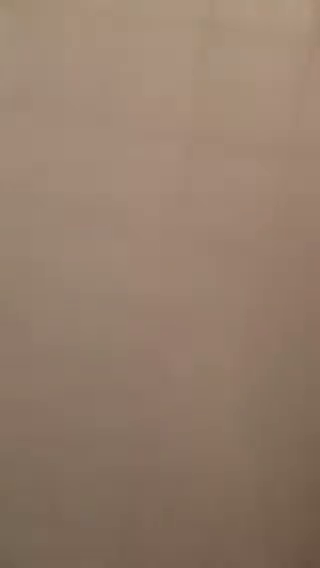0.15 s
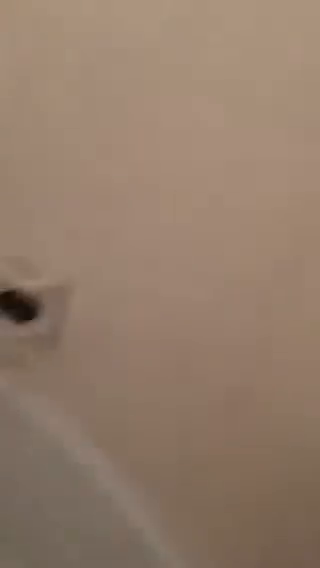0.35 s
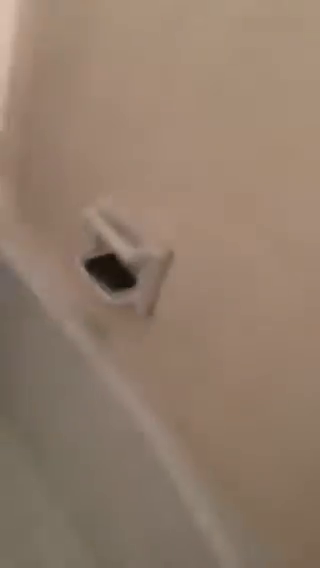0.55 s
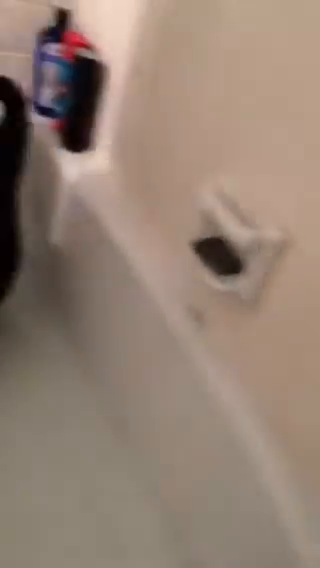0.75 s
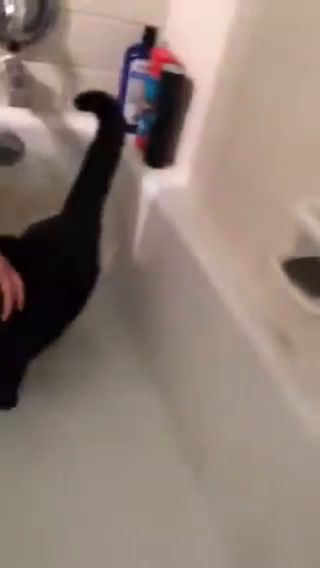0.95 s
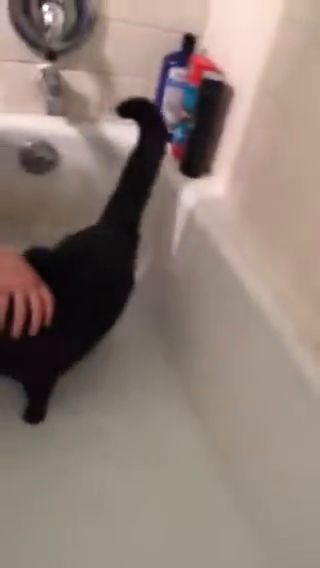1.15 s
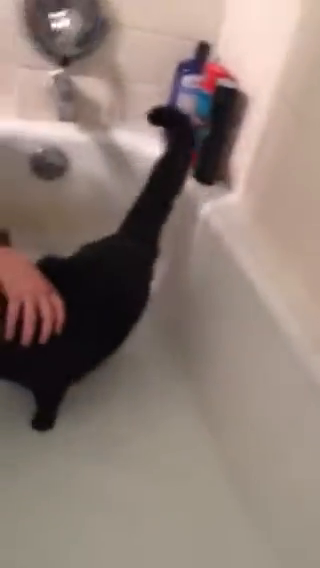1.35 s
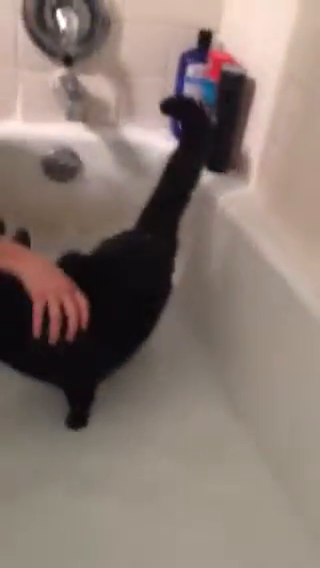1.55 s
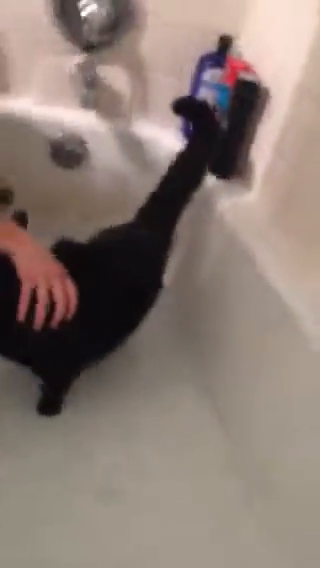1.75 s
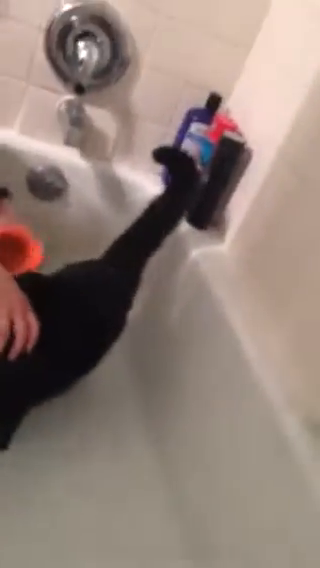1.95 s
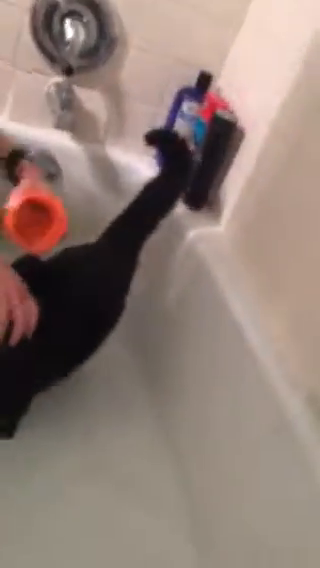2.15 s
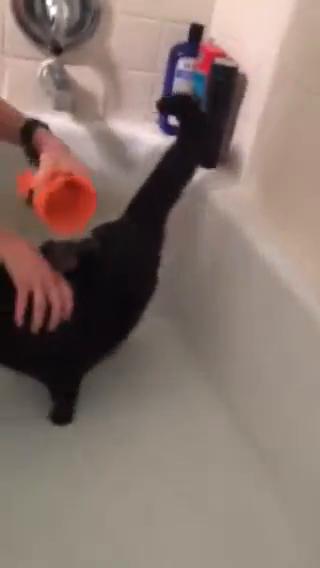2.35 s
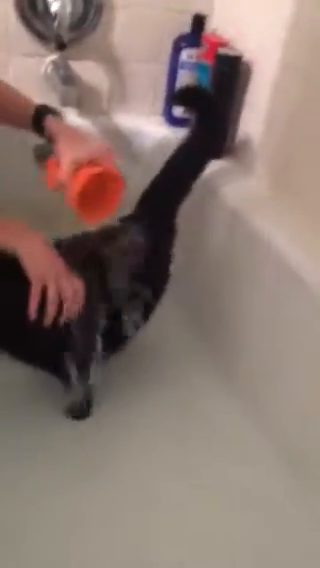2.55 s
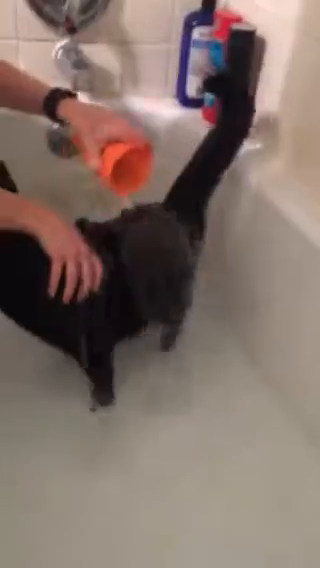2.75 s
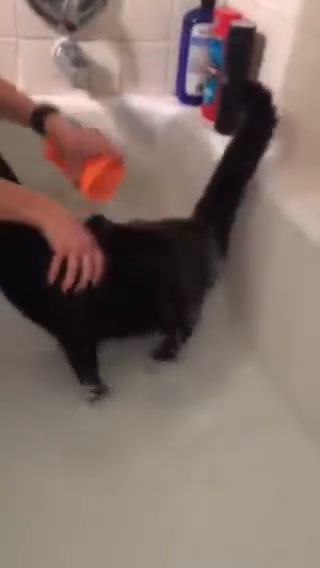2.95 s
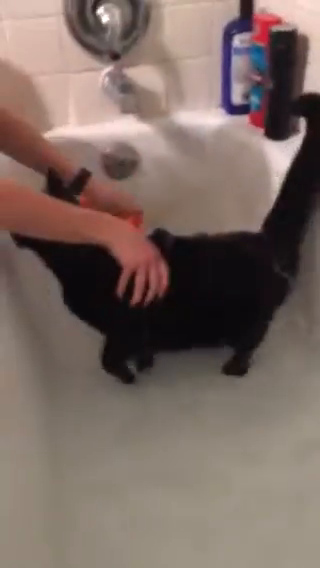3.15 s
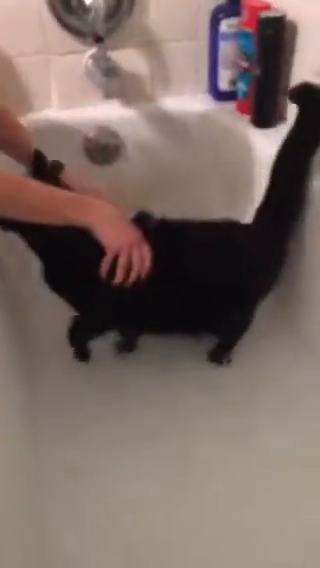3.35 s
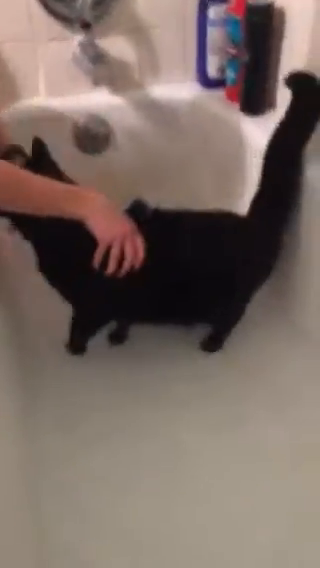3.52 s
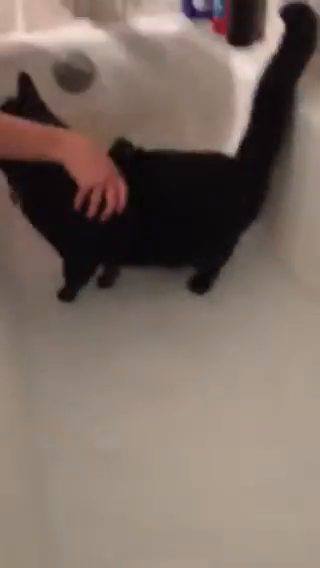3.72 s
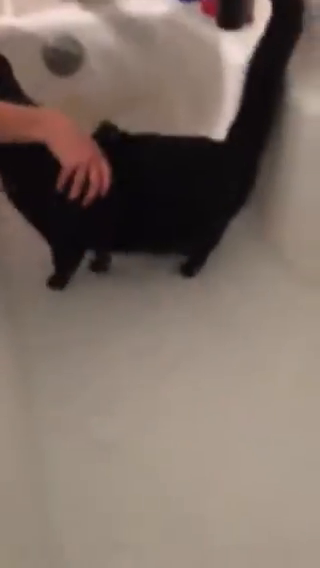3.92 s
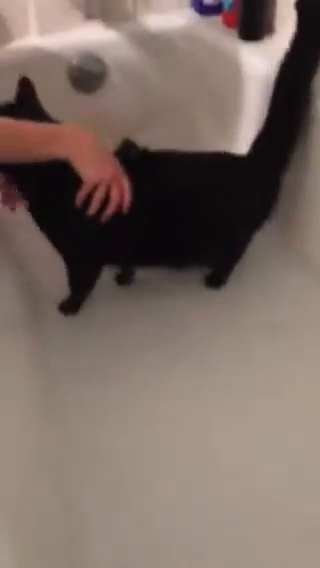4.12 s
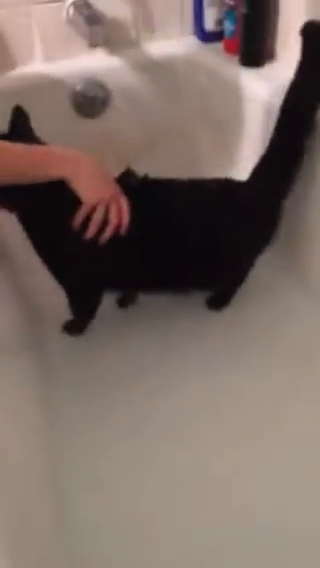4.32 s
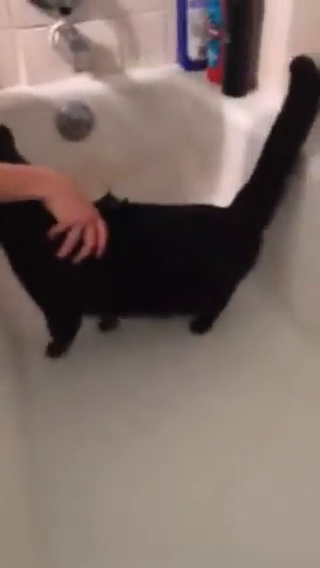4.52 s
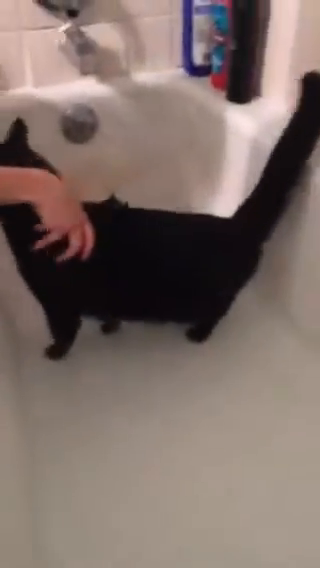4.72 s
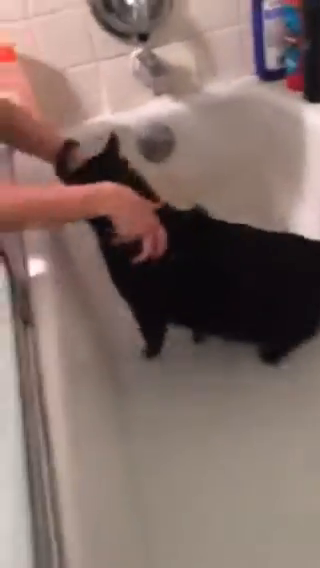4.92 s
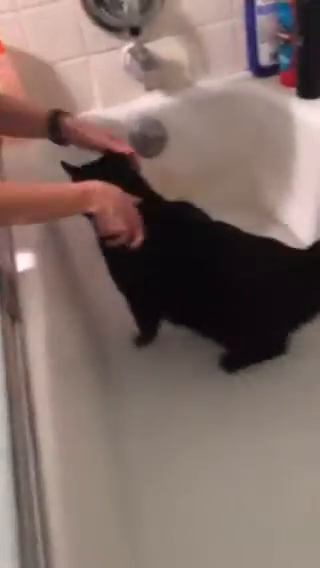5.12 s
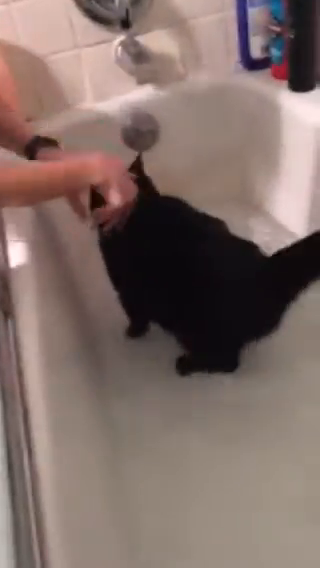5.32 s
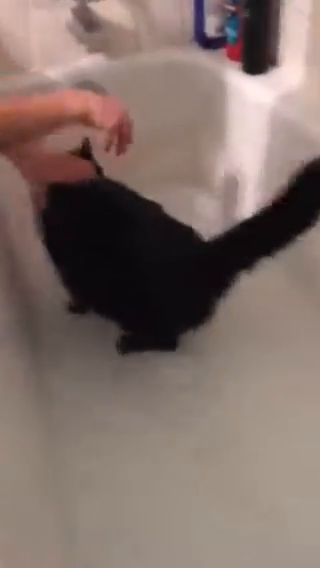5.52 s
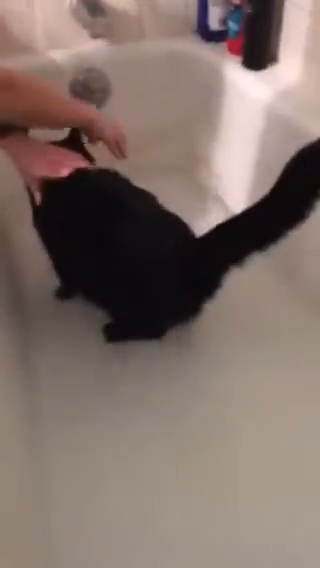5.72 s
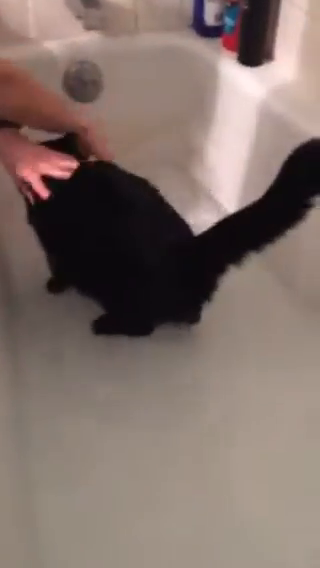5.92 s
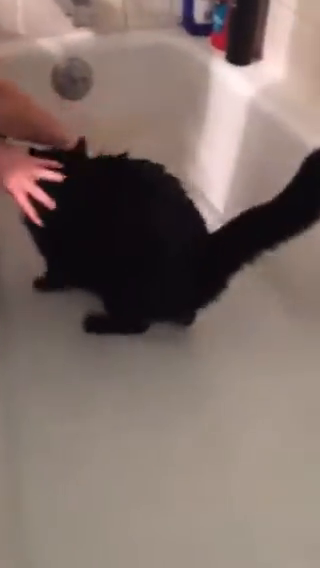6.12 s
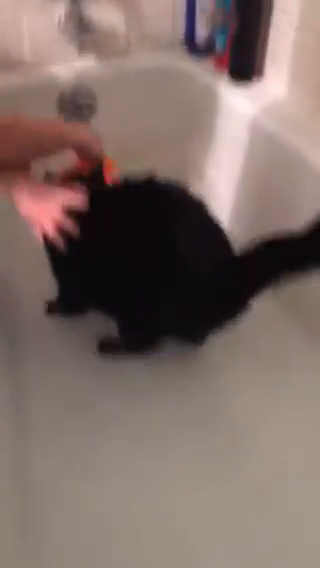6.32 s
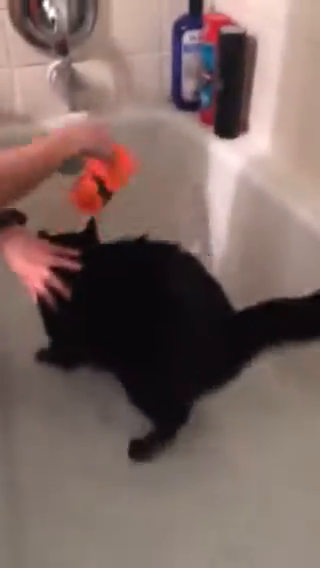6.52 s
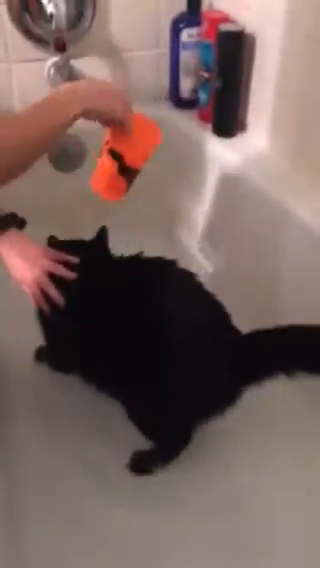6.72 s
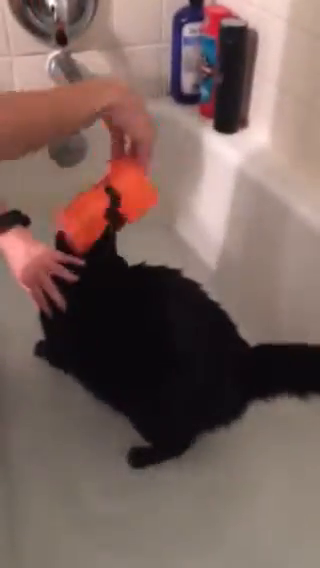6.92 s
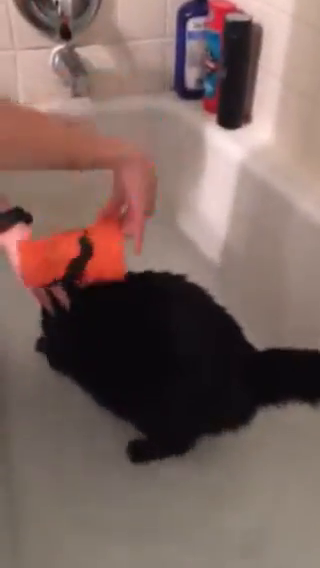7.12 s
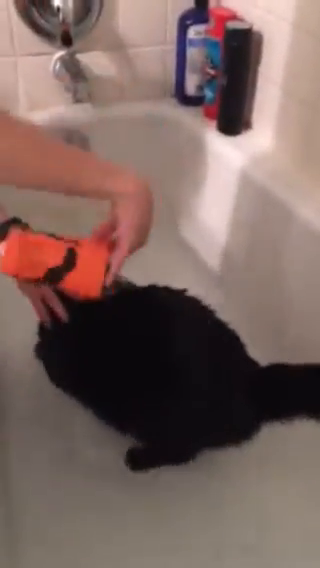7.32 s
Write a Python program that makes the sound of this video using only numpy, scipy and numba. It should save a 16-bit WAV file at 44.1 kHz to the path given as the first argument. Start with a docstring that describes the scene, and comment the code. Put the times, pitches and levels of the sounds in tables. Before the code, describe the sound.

A small bathroom with a hard tub and tiles, heard close, with short bright echoes. From 0 to about 0.7 seconds a cupful of water runs into shallow bath water, with plopping bubbles, fine spray and low gurgles. From 0.8 to 2.6 it calms to uneven drips and small splashes, with a brief dull slipping of wet skin around 1.4, a hollow plop near 1.6 and soft low knocks around 0.9 and 2.0 to 2.1. At 2.7 a second cupful lands, crisp and spattering, gurgling strongly until about 3.4, with a last splash at 3.5. Drips thin out through 4.4, then near silence: faint air and a lumpy low rumble. At 6.2 to 6.7 a few light plops and ticks return, a tiny drip rises in pitch at 6.8, and only sparse, faint drops remain until 7.4.

```python
"""Cat rinsed in a shallow bathtub

Two cupfuls pour off into the bath water with spray, bubbling and low gurgles: clouds of ringing bubbles over a
thin wash of noise. Single drips, smacks with droplets, paw splashes, dull knocks and a run of slips stand out.
Near bubbles, smack crackle and slips also reach the microphone directly; the hard tub and tiles answer with
echoes and a brief dense tail. Steady air and a lumpy low rumble, both coloured noise, lie under it all."""
import sys
import numpy as np
from scipy import signal
from scipy.io import wavfile
from scipy.ndimage import uniform_filter1d
from numba import njit

SR = 44100
rng = np.random.default_rng(int(sys.argv[2]) if len(sys.argv) > 2 else 0)


def materialize(psi):
    """Save the field psi as 16-bit PCM at rate SR to the path in sys.argv[1].

    A 1-D psi becomes a single channel; in a 2-D psi each row is a channel.
    """
    bounded = np.clip(np.atleast_2d(psi).T, -1, 1)
    quanta = np.round(bounded * 32767).astype(np.int16)
    wavfile.write(sys.argv[1], SR, quanta)


N = 325017  # length in samples

# Source levels below are set ahead of the mix in scene(); colours are relative levels.
# low rumble of the place: [t/s, level/dB]
RUMBLE_LEVEL = [(0.0, -58), (.3, -51), (.7, -61), (1.03, -58), (1.3, -63.5), (1.66, -57), (2.2, -47),
                (2.5, -62), (2.9, -47), (3.18, -54), (3.6, -53), (4.2, -70.5), (4.499, -65.5),
                (4.998, -63.5), (5.9, -65), (6.4, -61), (7.37, -63.5)]
# spectrum of the rumble: [f/Hz, level/dB per Hz]
RUMBLE_COLOUR = [(15, -46.5), (25, -18), (46, -15.5), (65, 1), (81, 5), (102, -11.5), (135, -4), (194, -21),
                 (248, -18), (260, -15.5), (340, -40.5), (570, -120)]
# spectrum of the steady air in the room: [f/Hz, level/dB per Hz]
AIR_COLOUR = [(71, -17.5), (120, 0.5), (308, -10), (454, -8), (1030, -17), (1620, -19), (3110, -25),
              (12800, -30), (15000, -28), (16000, -58.5)]
AIR_DB = -69.5
# water pouring off, one table a cupful: [t/s, spray level/dB, bubbling level/dB, gurgle level/dB, gurgle f/Hz]
POURS = [
    [(0.0, -63, -59, -71, 450), (.06, -44.5, -39.5, -51, 484), (.12, -39.5, -39, -38.5, 292),
     (.2, -37, -37.5, -39, 302), (.27, -44.5, -35, -33.5, 353), (.33, -43.5, -37, -32, 216),
     (.47, -37.5, -34, -31.5, 376), (.53, -43, -37, -37, 392), (.68, -57, -50.5, -58.5, 302),
     (.85, -72, -59, -80, 300)],
    [(2.7, -66, -70, -67, 400), (2.77, -40.5, -36, -49.5, 333), (2.81, -38, -44.5, -39, 393),
     (2.85, -37, -28.5, -33.5, 490), (2.91, -32.5, -41, -32, 371), (3.02, -39, -35.5, -33.5, 414),
     (3.19, -37.5, -36, -35, 438), (3.25, -38.5, -36.5, -26.5, 343), (3.37, -43.5, -39, -39.5, 427),
     (3.48, -56, -52.5, -68.5, 423)],
]
BUBBLING_HZ, GURGLE_HZ = 1520, 344.7
LUMPS_DB = 1.8  # rms unevenness of the spray's gushes
# spectrum of the thin wash in the spray: [f/Hz, level/dB per Hz]
SPRAY_COLOUR = [(880, -29.5), (1500, -7), (1780, -5.5), (2540, -14.5), (2830, -7), (13700, -12.5),
                (15500, -15.5), (16000, -44)]
# bath lapping and dripping as it settles: [t/s, spray level/dB]
SETTLING = [(0.0, -57), (.7, -57.5), (1.44, -65.5), (1.9, -64), (2.2, -62), (2.55, -64), (3.65, -57),
            (4.0, -63.5), (4.45, -72), (4.8, -74), (5.75, -84.5), (6.14, -89.5), (6.4, -66.5), (6.8, -79.5),
            (7.37, -85)]
SETTLING_BUBBLING_DB, SETTLING_GURGLE_DB = -0.5, -3.5  # relative to the settling spray
# single ringing bubbles, tiny drips to large air pockets: [t/s, peak level/dB, f/Hz, decay/cycles]
BUBBLES = [(.018, -35, 4950, 16), (.028, -29, 2140, 10), (.041, -40, 492, 9.4), (.098, -7.5, 1580, 3.9),
           (.116, -26.5, 326, 6.4), (.153, -8.5, 320, 1.37), (.174, -30.5, 302, 6.6),
           (.198, -14, 2070, 7.1), (.208, -21, 3900, 8), (.246, -24, 305, 4.5), (.316, -20.5, 185, 5),
           (.379, -16, 247, 2.6), (.464, -9, 1540, 2.9), (.473, -22.5, 416, 10.8), (.525, -3.5, 1260, 2.73),
           (.559, -27.5, 310, 4.5), (.625, -23, 3070, 5.2), (.665, -12.5, 7300, 5.1),
           (.684, -25.5, 1250, 4.3), (.738, -36, 1970, 14), (.808, -29.5, 6650, 7.5), (.82, -36, 3530, 6.2),
           (.884, -31.5, 2300, 3.5), (.93, -35, 830, 4.8), (.964, -28.5, 690, 2.7), (.996, -37, 2334, 23),
           (1.044, -32, 1300, 5.9), (1.079, -28, 813, 5.4), (1.105, -25.5, 844, 6.5),
           (1.129, -35, 945, 7.2), (1.159, -40.5, 935, 16), (1.229, -35.5, 1260, 8.6),
           (1.262, -31.5, 1320, 3), (1.264, -34, 7240, 9.7), (1.282, -33, 7800, 9), (1.35, -33, 2120, 4.8),
           (1.352, -39, 4360, 9.1), (1.461, -50, 1400, 12), (1.49, -50, 1410, 13), (1.516, -34, 607, 7.2),
           (1.517, -29, 1920, 6.9), (1.573, -11, 520, 1.43), (1.54, -38, 140, 3.6), (1.6, -32.5, 149, 3.1),
           (1.655, -39, 139, 4), (1.603, -21, 930, 2), (1.614, -30, 432, 2.6), (1.717, -46, 1350, 11),
           (1.771, -26.5, 630, 2.1), (1.85, -45, 1104, 15), (1.855, -46.5, 2630, 16),
           (2.021, -41, 3200, 6.8), (2.239, -35.5, 1214, 9), (2.275, -36, 1114, 8.2),
           (2.289, -42, 990, 8.1), (2.321, -25, 883, 2.55), (2.325, -35, 3200, 9.7), (2.245, -41, 1900, 16),
           (2.222, -39, 4850, 7), (2.346, -36, 805, 6.9), (2.372, -27, 6800, 7.3), (2.108, -25, 8250, 6.8),
           (2.452, -43.5, 1220, 16), (2.642, -23, 578, 2.7), (2.652, -21, 2850, 6.8),
           (2.759, -17, 1950, 14), (2.772, -27, 320, 3.6), (2.779, -34, 1790, 9), (2.807, -14.5, 1127, 8.7),
           (2.836, -24, 530, 4.8), (2.839, -21, 1340, 15), (2.905, -2, 2860, 2.7), (2.919, -39, 204, 10),
           (2.964, -23, 1010, 9.2), (3.12, -30, 334.3, 28), (3.172, -20.5, 1770, 7), (3.179, -27, 465, 4.8),
           (3.22, -35, 890, 14), (3.225, -19, 3180, 12), (3.249, -19, 817, 5.9), (3.254, -26, 152, 3),
           (3.289, -33, 764, 14), (3.349, -30, 432, 19), (3.361, -16.5, 4270, 6.3), (3.429, -32, 604, 5.9),
           (3.502, -23, 128, 3.7), (3.534, -29.5, 734, 10.4), (3.602, -28.5, 1055, 10),
           (3.629, -31, 993, 6.6), (3.761, -34.5, 1060, 10.4), (3.793, -29, 1295, 5.2),
           (3.804, -17.5, 292, 1.1), (3.852, -35.5, 1010, 5.9), (3.885, -36.5, 987, 10.5),
           (4.049, -42, 1500, 7), (4.138, -38.5, 2170, 7.9), (4.171, -54, 2070, 10), (4.166, -50, 5200, 22),
           (4.295, -54, 2150, 12), (4.382, -35, 2307, 28), (4.469, -49, 1170, 7.3), (4.7, -53, 460, 17),
           (4.704, -40, 665, 3.2), (4.959, -53, 283, 8.6), (5.495, -47.5, 1870, 11.2),
           (6.217, -29.5, 477, 1.3), (6.221, -40.5, 3060, 11), (6.363, -40, 1560, 6.4),
           (6.363, -48.5, 1050, 8), (6.468, -23.5, 359, 2.9), (6.472, -31.5, 730, 15),
           (6.5, -38, 3170, 4.2), (6.5, -43.5, 6200, 11), (6.517, -30, 806, 3.9), (6.519, -43, 1950, 8.2),
           (6.606, -36, 7500, 5.9), (6.648, -40, 1720, 10), (6.774, -49, 7340, 18), (6.796, -48, 3800, 17),
           (6.857, -50, 6900, 12), (6.879, -29.5, 4570, 6.5), (7.006, -52.5, 1975, 22),
           (7.007, -50.5, 2720, 19), (7.153, -50.5, 3200, 17), (7.246, -51.5, 8650, 14)]
BUBBLE_RISE = 0.062  # largest climb of pitch as a share
SMALL_BUBBLE_HZ = 1500  # bubbles above this pitch climb less
# drops smacking the surface: [t/s, middle level/dB, treble level/dB, body level/dB]
SMACKS = [(.0199, -35, -62, -64), (0.0517, -29, -57, -25.5), (.094, -43, -58, -24), (.154, -19, -22, -13),
          (0.195, -21.5, -60, -33), (0.262, -25, -52, -21), (0.3177, -23, -62, -48),
          (0.3802, -21, -53, -18), (0.6269, -28.5, -37, -21), (0.666, -51, -33, -56),
          (0.8078, -41, -42, -45), (0.9791, -39, -45, -57), (1.0486, -47, -51, -50),
          (1.1104, -38.5, -48, -37), (1.2446, -55, -44, -40.5), (1.2638, -56, -41, -45),
          (1.3513, -42.5, -53, -62), (1.517, -63, -43, -28.5), (1.535, -38.5, -50, -57),
          (1.5733, -61, -70, -26), (1.7741, -35.5, -47, -33), (1.8436, -41.5, -48, -64),
          (2.0206, -47, -50, -41), (2.0746, -44, -37.5, -41), (2.108, -37.5, -44, -39),
          (2.1844, -59, -67, -39), (2.2196, -42, -45, -54), (2.2863, -48, -48, -38.5),
          (2.3218, -39, -66, -40), (2.371, -36, -58, -59), (2.631, -42, -64, -45), (2.644, -32, -58, -23),
          (2.758, -19, -31, -46), (2.8157, -18, -29, -32), (2.8386, -35, -24, -14),
          (2.903, -17.5, -46, -15.5), (2.9248, -16, -44, -13), (2.9506, -17, -38, -39),
          (3.1025, -26, -24.5, -38), (3.177, -19.5, -42, -23), (3.2003, -23.5, -46, -35),
          (3.221, -21.5, -47, -20), (3.3614, -22.5, -27, -39), (3.5069, -19, -20.5, -22.5),
          (3.602, -57, -39, -51), (3.6594, -71, -37, -39), (3.76, -37.5, -40.5, -35),
          (3.7925, -50, -50, -27.5), (3.8694, -59, -48, -44), (3.901, -54, -43.5, -41),
          (3.9614, -57, -55, -37), (4.23, -67, -51, -67), (4.361, -66, -48, -72), (4.382, -46.5, -48, -61),
          (4.97, -78, -60, -68), (5.2035, -55, -52.5, -60), (5.495, -51, -60, -68.5),
          (6.2213, -30.5, -39.5, -36.5), (6.3739, -41, -50, -39.5), (6.449, -70, -54, -67),
          (6.6048, -52, -51.5, -64), (6.6477, -36, -58, -45), (6.653, -43, -46.5, -42),
          (6.796, -52, -60, -50), (6.8771, -51, -50, -76), (6.891, -48, -51, -76), (6.969, -79, -55.5, -75),
          (7.057, -78, -58, -78), (7.152, -56, -69, -63), (7.244, -59, -67, -63)]
CRACKLE_S, CRACKLE_RISE_S = 0.0039, 0.00038  # decay constant and linear onset
SPATTER_S, SPATTER_DB = 0.022, -9  # delay constant of falling droplets; their highest level against the smack
# dull knocks on the tub: [t/s, peak level/dB]
KNOCKS = [(0.904, -35.5), (1.96, -30.5), (2.003, -37), (2.05, -31), (2.104, -31.5), (2.139, -58)]
KNOCK_HZ, KNOCK_CYCLES = 74, 2.94
# paws and hands stirring the water: [t/s, spray level/dB, bubbling level/dB, gurgle level/dB, bubbling f/Hz]
SPLASHES = [(0.982, -56.5, -78, -53, 1130), (1.092, -72, -51.5, -51, 960), (1.578, -61, -49, -80, 2320),
            (1.61, -76, -50.5, -57, 935), (2.129, -60.5, -55.5, -61, 1670), (2.36, -54.5, -58.5, -66, 820),
            (2.654, -55, -46.5, -88.5, 2920), (2.679, -54.5, -56, -41.5, 1170),
            (3.512, -37.5, -54.5, -56, 585), (3.611, -69, -38.5, -46.5, 1083), (3.921, -64, -56, -82, 920),
            (4.75, -84, -71, -56, 865), (6.22, -63.5, -84.5, -64, 1150), (6.441, -71, -80, -63.5, 790),
            (6.649, -71, -62, -62, 1910), (6.98, -73.5, -85.5, -87, 2020)]
SPLASH_RISE_DB_PER_S, SPLASH_FALL_DB_PER_S = 398, 159.5
SPLASH_GURGLE_SHARE = .55  # gurgle pitch over bubbling pitch
# wet skin slipping on the rim, one row: [start t/s, end t/s, rate/slips per s, level/dB, f/Hz]
SLIPS = (1.363, 1.455, 54, -35, 340)
# drips whose pitch almost doubles: [t/s, peak level/dB, f/Hz, life/cycles]
CLIMBERS = [(6.797, -46.5, 1047, 34)]
CLIMBER_RISE = .99  # climb of pitch as a share
# early echoes off enamel and tiles: [delay t/s, level/dB]
TUB_ECHOES = [(.0045, -12), (.0085, -20.5), (.0155, -7.5), (.022, -20.5), (.031, -21.5)]
# time for the tub's tail to fall 60 dB: [f/Hz, decay t/s]
TUB_DECAY = [(100, 0.16), (400, 0.37), (1500, 0.2), (5000, 0.29), (14000, 0.049)]
EDGE_HZ = 15500  # upper limit of the microphone chain


def gain_of(db):
    """Decibels to gain."""
    return 10 ** (np.asarray(db) / 20)


def evened(x):
    """Scales to rms 1."""
    return x / np.sqrt(np.mean(x ** 2) + 1e-20)


def read(points, hz):
    """Reads a table on a log-frequency axis."""
    f, value = np.transpose(points)
    return np.interp(np.log(hz + 1), np.log(f + 1), value)


def hiss(colour, size, patchy_db, flicker_db):
    """Coloured noise with drifting patches and a flicker shared by all bands."""
    frames = 4 * N // size + 5
    hz = np.fft.rfftfreq(size, 1 / SR)
    real, imag, patches = rng.standard_normal((frames, len(hz), 3)).T
    patches = uniform_filter1d(patches, size=6, axis=0)  # across frequency
    patches = evened(uniform_filter1d(patches, size=10, axis=1))  # across time
    flicker = evened(uniform_filter1d(rng.standard_normal(frames), size=4))
    level_db = read(colour, hz)[:, None] + patchy_db * patches
    spectrum = (real + 1j * imag) * gain_of(level_db + flicker_db * flicker)
    noise = signal.istft(spectrum, nperseg=size, noverlap=3 * size // 4)[1]
    return evened(noise[:N])


@njit
def ring(s, peak, hz, cycles, rise, samples, sr):
    """Each bubble is a dying sine whose pitch can climb as it nears the surface."""
    out = np.zeros(samples)
    for k in range(len(s)):
        start, phase = int(s[k] * sr), 0.
        life = cycles[k] * sr / hz[k]  # samples for an ordinary bubble to fall by e squared
        for i in range(min(int(3 * life) + 2, samples - start)):
            u = i / life
            phase += 2 * np.pi * hz[k] * (1 + rise[k] * min(u, 1.)) / sr
            # a fast climber holds its tone longer, then bursts at the surface
            fade = np.exp(-2 * u) if rise[k] < .6 else np.exp(-u - 10 * max(u - 1, 0.))
            onset = min(1., i * hz[k] / (2 * sr))  # two cycles
            out[start + i] += peak[k] * np.sin(phase) * fade * onset
    return out


def ring_near(s, db, hz, cycles, rise):
    """Rings single bubbles close by; small, high ones climb less."""
    s, db, hz, cycles = np.broadcast_arrays(s, db, hz, cycles)
    rise = rise * np.minimum(1, SMALL_BUBBLE_HZ / hz)
    return ring(s.copy(), gain_of(db), hz.astype(float), np.clip(cycles, 1, 80), rise, N, SR)


def shower(s, level_db, hz, count, octaves, cycles, uneven_db, thinning, rise):
    """A cloud of random bubbles; calm water makes fewer of them, a few are large."""
    at, keep, size, tune, length = rng.random((count, 5)).T
    at = at * N / SR
    db = np.interp(at, s, level_db)
    share = np.clip(gain_of(thinning * (db - np.max(level_db))), .2, 1)  # chance that a bubble forms
    pitch = np.interp(at, s, hz) * 2 ** (octaves * (2 * tune - 1))
    pitch = np.clip(pitch, 60, .4 * SR)
    turns = cycles * (.5 + length)
    size = gain_of(-uneven_db * np.log(1.03 - size))
    # estimated power of the cloud at unit level
    energy = np.mean(size ** 2) * share * count / N * turns * SR / pitch / 8
    peak = (keep < share) * size * gain_of(db) / np.sqrt(energy)
    return ring(at, peak, pitch, turns, rise * length, N, SR)


def room_tone():
    """Steady air and a lumpy low rumble, both coloured noise at the place itself."""
    rumble_db = np.interp(np.arange(N) / SR, *np.transpose(RUMBLE_LEVEL))
    rumble = gain_of(rumble_db) * hiss(RUMBLE_COLOUR, size=4096, patchy_db=0.5, flicker_db=2.5)
    air = gain_of(AIR_DB) * hiss(AIR_COLOUR, size=1024, patchy_db=2, flicker_db=2)
    return rumble + air


def settling_flow(t):
    """The lapping bath as power of spray, bubbling and gurgle, with the two pitches."""
    offsets_db = np.array([[0], [SETTLING_BUBBLING_DB], [SETTLING_GURGLE_DB]])
    calm_db = np.interp(t, *np.transpose(SETTLING)) + offsets_db
    return gain_of(2 * calm_db), np.array([[BUBBLING_HZ], [GURGLE_HZ]])


def pour_flow(t, pour):
    """One cupful as power of the three clouds while it runs off, with the two pitches."""
    s, *levels_db, gurgle_hz = np.transpose(pour)
    running = (t >= s[0]) * (t <= s[-1])
    power = running * gain_of([2 * np.interp(t, s, db) for db in levels_db])
    return power, np.array([BUBBLING_HZ + 0 * t, np.interp(t, s, gurgle_hz)])


def water():
    """Levels and pitches of the clouds: flows add in power, and power weights their log pitch."""
    t = np.arange(0, N / SR + .01, .002)  # every 2 ms
    flows = [settling_flow(t)]
    flows += [pour_flow(t, pour) for pour in POURS]
    flows += [splash_flow(t, splash) for splash in SPLASHES]
    power = sum(flow for flow, hz in flows)
    tune = sum(flow[1:] * np.log(hz) for flow, hz in flows)
    return t, 10 * np.log10(power), np.exp(tune / power[1:])


def moving_water():
    """Spray, bubbling, gurgle and a low slosh are clouds of bubbles; the spray adds a thin wash."""
    s, (spray_db, bubbling_db, gurgle_db), (bubbling_hz, gurgle_hz) = water()
    gushes = evened(uniform_filter1d(rng.standard_normal(len(s)), size=25))
    spray_db = spray_db + LUMPS_DB * gushes
    spray = shower(s, spray_db, 0 * s + 5000, count=30000, octaves=1.5, cycles=3,
                   uneven_db=4, thinning=.5, rise=.05)
    bubbling = shower(s, bubbling_db, bubbling_hz, count=9000, octaves=.8, cycles=4.1,
                      uneven_db=4.0, thinning=.6, rise=0.17)
    gurgle = shower(s, gurgle_db, gurgle_hz, count=2000, octaves=0.87, cycles=2.27,
                    uneven_db=4.0, thinning=.3, rise=0.21)
    slosh = shower(s, gurgle_db, 0 * s + 150, count=500, octaves=0.41, cycles=2.5,
                   uneven_db=4.5, thinning=0.14, rise=.15)
    wash_gain = gain_of(np.interp(np.arange(N) / SR, s, spray_db))
    wash = wash_gain * hiss(SPRAY_COLOUR, size=256, patchy_db=3, flicker_db=2.5)
    return gain_of(-5.5) * spray + bubbling + gurgle + gain_of(-7.5) * slosh + gain_of(-2) * wash


def bubbles():
    """Single bubbles of trapped air ring near the microphone."""
    return ring_near(*np.transpose(BUBBLES), BUBBLE_RISE)


def band(x, low_hz, high_hz):
    """Band-pass."""
    sos = signal.butter(N=3, Wn=[low_hz, high_hz], btype="bandpass", fs=SR, output="sos")
    return signal.sosfilt(sos, x)


def smacks():
    """Each smack is a tick and a few milliseconds of crackle, split in middle, treble and body."""
    ticks, crackles = np.zeros((3, N)), np.zeros((3, N))
    t = np.arange(900) / SR
    shape = np.exp(-t / CRACKLE_S) * np.minimum(t / CRACKLE_RISE_S, 1)
    for s, *db in SMACKS:
        at = round(s * SR)
        ticks[:, at] += gain_of(db)
        crackles[:, at:at + 900] += gain_of(db)[:, None] * rng.standard_normal(900) * shape
    return [band(middle, 2500, 7000) + band(treble, 7000, 14000) + band(body, 400, 2500)
            for middle, treble, body in (ticks, crackles)]


def spatter():
    """Each smack throws up a few droplets that land soon after as short pitched ticks in three bands."""
    s, *db = np.transpose(SMACKS)
    late, tune, size = rng.random((len(s), 12, 3)).T
    bands = np.arange(12) % 3  # middle, treble, body
    wait = -SPATTER_S * np.log(1 - 0.67 * late)
    low_hz, high_hz = np.array([[2500, 7000, 600], [7000, 13000, 2500]])[:, bands, None]
    # later droplets are fainter, by 340 dB per s
    peak = gain_of(np.array(db)[bands] + SPATTER_DB - 7.9 * size - 340 * wait)
    hz = (low_hz * (high_hz / low_hz) ** tune).ravel()
    return ring((s + wait).ravel(), peak.ravel(), hz, 3.9 + 0 * hz, 0.056 + 0 * hz, N, SR)


def knocks():
    """Dull knocks on the tub, each a low sine that dies within a few cycles."""
    return ring_near(*np.transpose(KNOCKS), KNOCK_HZ, KNOCK_CYCLES, BUBBLE_RISE)


def splash_flow(t, splash):
    """One paw or hand splash: power that swells and dies evenly in dB, with the two pitches."""
    s, *levels_db, hz = splash
    shape_db = np.where(t < s, SPLASH_RISE_DB_PER_S * (t - s), SPLASH_FALL_DB_PER_S * (s - t))
    power = gain_of(2 * (np.array(levels_db)[:, None] + shape_db))
    return power, np.array([[hz], [SPLASH_GURGLE_SHARE * hz]])


def skin_slips():
    """Wet skin slips on the rim in a short run of unevenly timed, dull pulses."""
    start, end, per_s, db, hz = SLIPS
    s = np.arange(start, end, 1 / per_s)
    s = s + 0.00085 * rng.random(len(s))
    return ring(s, gain_of(db) + 0 * s, hz + 0 * s, 1.5 + 0 * s, 0 * s, N, SR)


def climbing_drips():
    """A drip's bubble climbs almost an octave, then bursts at the surface."""
    return ring_near(*np.transpose(CLIMBERS), CLIMBER_RISE)


def tub(x):
    """Direct sound, echoes off enamel and tiles, and three dense random tails cross-faded at a steady 3 Hz."""
    out = x.copy()
    for k, (delay, db) in enumerate(TUB_ECHOES):
        lag = round(delay * SR)
        out[lag:] += (-1) ** k * gain_of(db) * x[:N - lag]
    for k in range(3):
        taps = np.zeros(SR // 2)
        at = np.arange(150, SR // 2 - 20, 12)
        taps[at + rng.integers(0, 12, len(at))] = rng.choice([-1., 1.], len(at))
        hz, t, spectrum = signal.stft(taps, SR, nperseg=256)
        t60 = np.maximum(read(TUB_DECAY, hz), .05)[:, None]
        tail = signal.istft(spectrum * gain_of(-60 * t / t60), SR, nperseg=256)[1]
        # weights of constant summed power, so that no single tail's resonances stand out
        weight = np.sqrt(2 / 3) * np.cos(2 * np.pi * (3 * np.arange(N) / SR + k / 3))
        out += gain_of(1.0) * signal.oaconvolve(x * weight, tail / np.linalg.norm(tail))[:N]
    return out


def scene():
    """Water in the ringing tub over the room tone; ticks mostly feed the tub, crackle is heard directly."""
    ticks, crackles = smacks()
    ticks = gain_of(10) * ticks
    slips = skin_slips()
    near = bubbles() + knocks() + climbing_drips()
    wet = tub(moving_water() + ticks + .72 * near + spatter() + 0.19 * slips)
    wet = wet - .6 * ticks  # weakens the direct path of the ticks
    direct = gain_of(2.5) * crackles + slips + 0.42 * near
    return (wet + direct + room_tone())[None]


def record(dry):
    """The microphone chain's upper band limit, a linear-phase low-pass."""
    lowpass = signal.firwin(301, EDGE_HZ, window=("kaiser", 9), fs=SR)
    return signal.oaconvolve(dry, lowpass[None], "same")


dry = scene()
out = record(dry)
materialize(out)
```